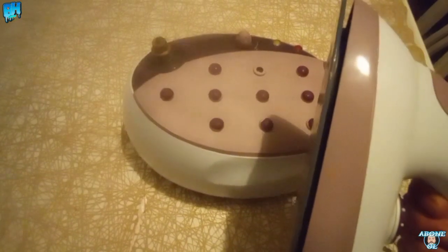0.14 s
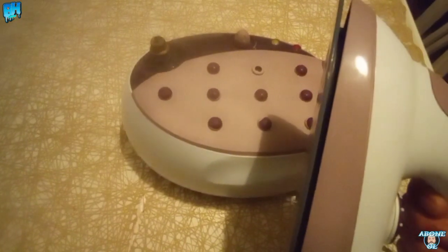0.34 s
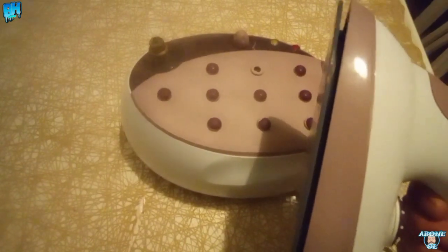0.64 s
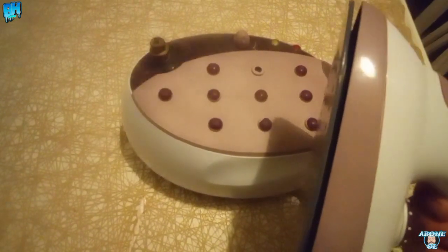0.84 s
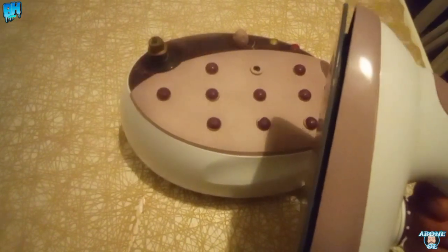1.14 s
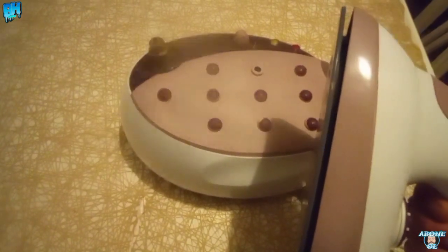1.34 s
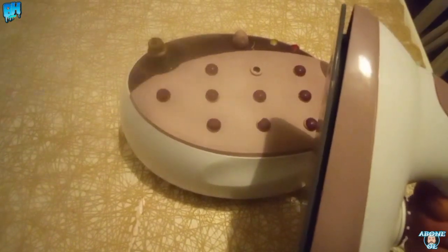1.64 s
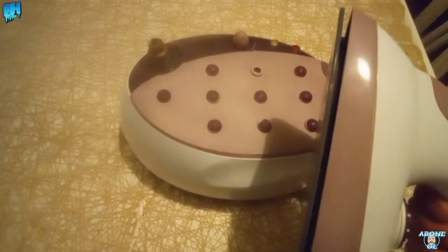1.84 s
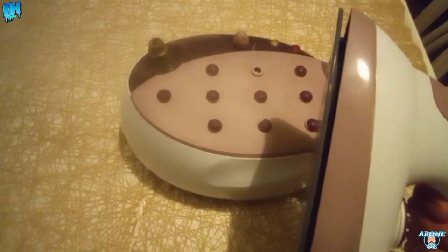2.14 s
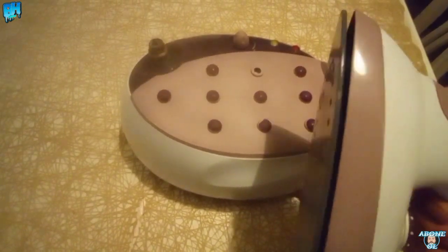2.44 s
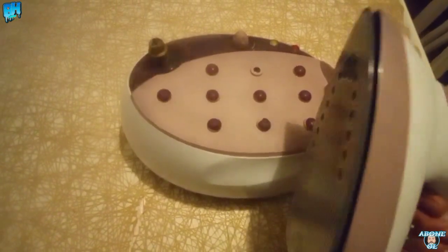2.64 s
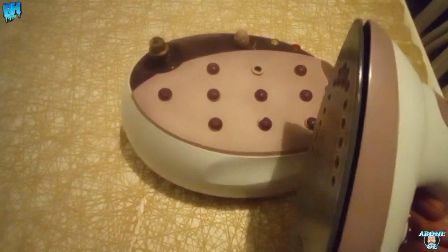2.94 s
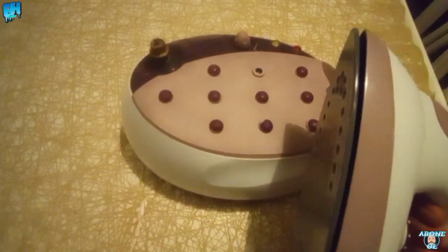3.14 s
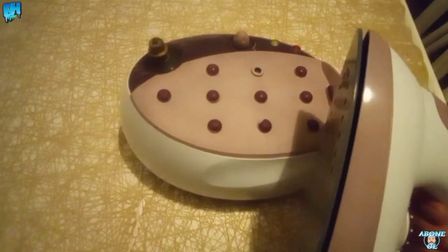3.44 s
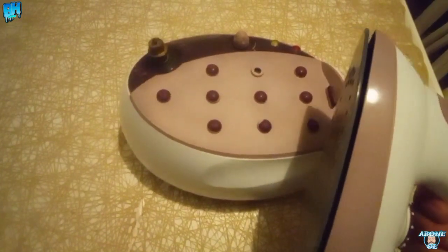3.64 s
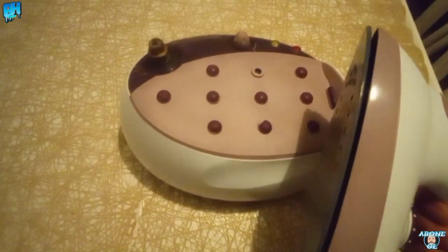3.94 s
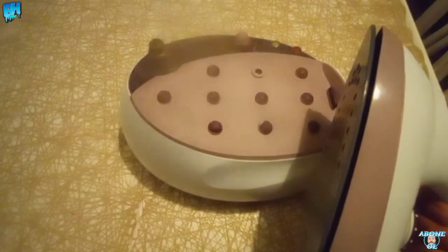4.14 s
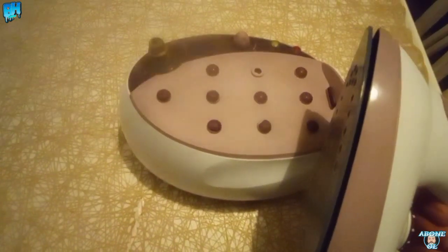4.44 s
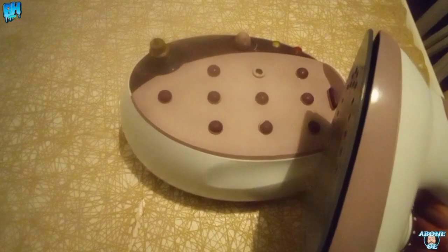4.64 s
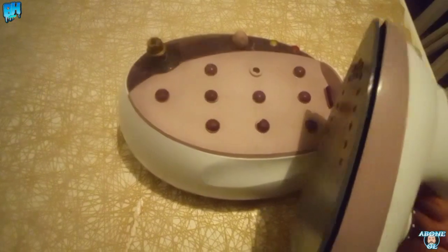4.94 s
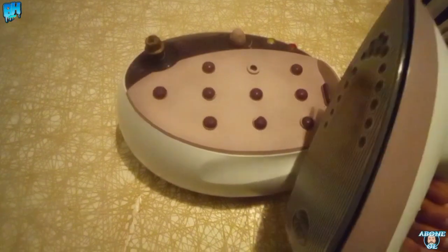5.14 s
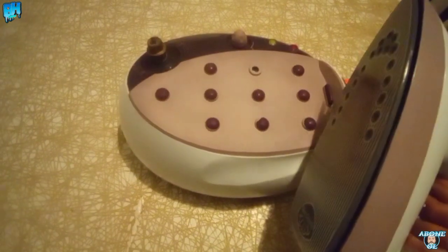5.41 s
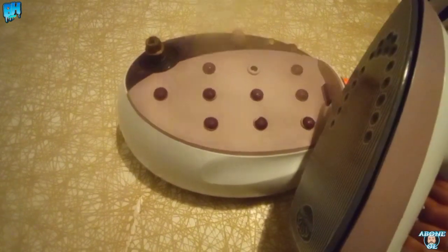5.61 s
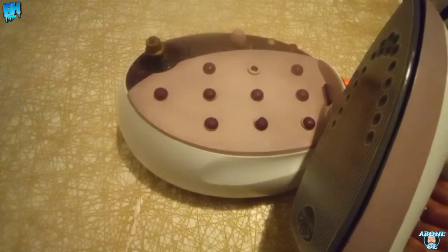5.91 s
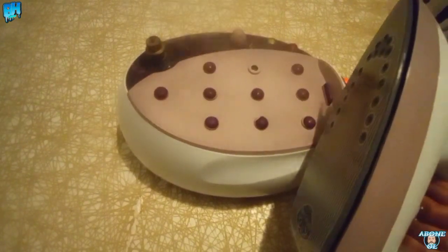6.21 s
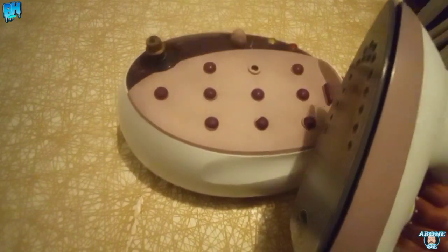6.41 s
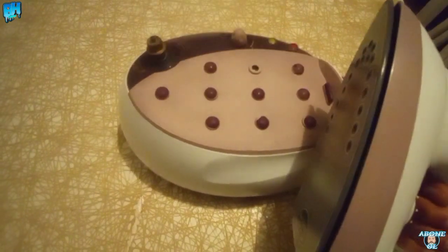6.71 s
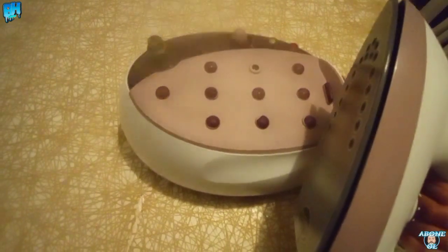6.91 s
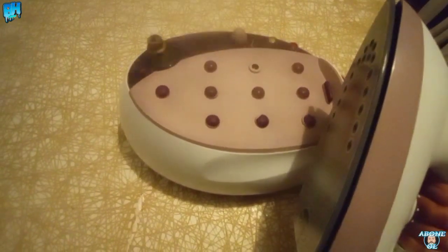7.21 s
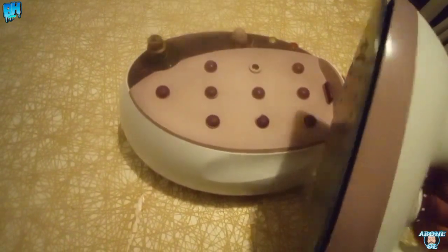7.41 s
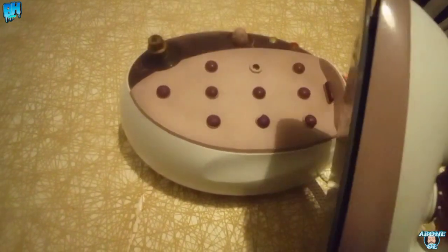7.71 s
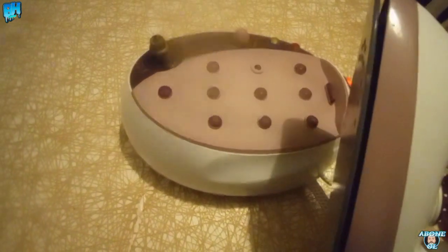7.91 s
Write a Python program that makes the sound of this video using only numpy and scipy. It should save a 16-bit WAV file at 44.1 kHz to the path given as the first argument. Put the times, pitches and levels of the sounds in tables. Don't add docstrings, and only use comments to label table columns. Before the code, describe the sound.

Close up in a small room, a steam iron fires airy, slightly whistling bursts of uneven length. Every burst opens with a sharp click and hard valve knock, and closes with a thinner click and weaker thud, leaving a short room tail. Quiet pauses reveal low simmering water, light handle taps and small plastic creaks. The final hiss continues to the cut, heard through one bass-light microphone.

```python
import sys
import numpy as np
from scipy import signal
from scipy.fft import rfft, irfft, next_fast_len
from scipy.io import wavfile
from scipy.ndimage import uniform_filter1d

SR = 44100
rng = np.random.default_rng(int(sys.argv[2]) if len(sys.argv) > 2 else 0)


def voltage_ratio(level):
    return 10 ** (np.asarray(level, float) / 20)


def master_out(mix):
    frames = np.transpose(np.atleast_2d(mix))
    ceiling = np.clip(frames, -1, 1)
    pcm = np.round(ceiling * 32767).astype(np.int16)
    wavfile.write(sys.argv[1], SR, pcm)


N = 355336

# snap_s, strike_s (steam starts), thump_s, strike_db, snap_hz
PRESSES = [
    (1.275, 1.288, 1.2928, -16, 5900),
    (4.0329, 4.041, 4.0448, -25, 6000),
    (5.5112, 5.5176, 5.5232, -17.5, 6680),
    (6.7492, 6.757, 6.7625, -18.5, 6680),
    (7.8049, 7.8183, 7.816, -18.5, 6020),
]
# snap_s, drop_s (plunger falls), thump_s, snap_db
RELEASES = [
    (.7038, .712, .716, -19.5),
    (2.563, 2.57, 2.578, -18),
    (4.8394, 4.85, 4.853, -18),
    (6.2736, 6.283, 6.287, -20.5),
    (7.4475, 7.455, 7.46, -17),
]


def evened(x):
    return x / np.sqrt(np.mean(x ** 2) + 1e-20)


def read(points, hz):
    f, value = np.transpose(points)
    return np.interp(np.log(hz + 1), np.log(f + 1), value)


def add(mix, start_s, sound):
    part = mix[round(start_s * SR):][:len(sound)]
    part += sound[:len(part)]


def noise(spectrum, size):
    hz = np.fft.rfftfreq(size, 1 / SR)
    white = rng.standard_normal(size)
    return evened(irfft(rfft(white) * voltage_ratio(read(spectrum, hz)), size))


def drift(seconds, size):
    span = max(round(seconds * SR), 2)
    wander = uniform_filter1d(rng.standard_normal(size), span)
    return evened(uniform_filter1d(wander, span))


def resonate(x, hz, width_hz):
    turn = np.exp(2j * np.pi * np.cumsum(hz * np.ones(len(x))) / SR)
    pole = np.exp(-2 * np.pi * width_hz / SR)
    smooth = signal.lfilter([1], np.poly([pole] * 3), x / turn)
    return evened((turn * smooth).real)


def ring(modes, t, longer=0.88, flip=1):
    out = np.zeros(len(t))
    for k, (hz, db, t60) in enumerate(modes):
        out += flip ** k * voltage_ratio(db - 60 * t / (t60 * longer)) * np.sin(2 * np.pi * hz * t)
    return out


def room(x):
    # pitch_hz, t60_s
    decay = [(150, 0.54), (400, 0.38), (1040, 0.44), (2760, 0.3), (6500, .28), (8500, 0.22), (12000, 0.24),
             (15000, 0.081)]
    echoes = np.zeros(SR)
    at = np.arange(200, SR - 20, 20)
    echoes[at + rng.integers(0, 20, len(at))] = rng.choice([-1., 1.], len(at))
    hz, t, z = signal.stft(echoes, SR, nperseg=256)
    fading = z * voltage_ratio(-60 * t / read(decay, hz)[:, None])
    tail = signal.istft(fading, SR, nperseg=256)[1]
    return signal.fftconvolve(x, tail / np.linalg.norm(tail))[:N]


def still_air():
    # pitch_hz, level_db per Hz
    floor = [(18, -25), (40, 1.5), (90, -0.5), (184, -6), (500, -16.5), (1000, -16.5), (1500, -18.5),
             (2350, -25), (6050, -32), (9000, -41.5), (16000, -44.5)]
    return voltage_ratio(-69) * noise(floor, N)


def boiler():
    # pitch_hz, width_hz, level_db
    shell_modes = [(364, 21, -14), (630, 29, -15), (1150, 68, .2), (1230, 140, -5.5), (1350, 70, -12),
                   (1740, 100, -9.5), (2220, 90, -21.5), (2660, 50, -21.5), (4900, 200, -28),
                   (6280, 140, -27)]
    bubbles = rng.standard_normal(N) * voltage_ratio(1.2 * drift(0.052, N))
    waver = 1 + 0.008 * drift(0.065, N)
    shell = np.zeros(N)
    for hz, width, db in shell_modes:
        shell += voltage_ratio(db + 1.9 * drift(0.055, N)) * resonate(bubbles, hz * waver, width)
    start_db, rise_db_per_s = -71.3, 0.85
    return voltage_ratio(start_db + rise_db_per_s * np.arange(N) / SR) * shell


def grip_rubs():
    # start_s, level_db, pitch_hz, length_s
    rubs = [(1.078, -63.5, 580, .074), (1.096, -72, 3300, .012), (2.735, -58.5, 420, 0.035),
            (2.737, -55, 1110, 0.033), (3.35, -60, 1750, .03), (3.348, -70, 700, .041),
            (3.505, -64, 600, .028), (3.704, -60, 470, .06), (4.962, -45.5, 524, .036),
            (5.09, -58, 130, .05), (5.19, -65, 480, .045), (7.704, -58, 2400, .014)]
    out, t = np.zeros(N), np.arange(6000) / SR
    for s, db, hz, length in rubs:
        swell = t / (0.27 * length) * np.exp(1 - t / (0.26 * length))
        add(out, s, voltage_ratio(db) * resonate(rng.standard_normal(len(t)), hz, 0.3 * hz) * swell)
    return out


def handle_taps():
    # pitch_hz, level_db per Hz
    scratch_colour = [(1500, -22), (3000, 6), (7000, -3.5), (10500, -19), (12000, -36.5), (15000, -31)]
    # start_s, level_db
    ticks = [(1.192, -56), (3.356, -54), (3.475, -62), (3.511, -44), (3.545, -57), (3.577, -53),
             (3.926, -53.5), (5.07, -55), (5.195, -58), (6.529, -48), (7.635, -49), (7.695, -46.5),
             (7.706, -49)]
    # start_s, level_db, shell_hz, hollow_db re shell, hollow_hz
    stops = [
        (.754, -28.5, 920, -16, 730),
        (.763, -28, 855, -10.5, 608),
        (5.024, -42.5, 984, 2, 483),
        (6.4, -56.5, 1230, -4, 350),
        (6.506, -49.5, 1150, -3.5, 630),
        (7.543, -39, 1000, -7, 590),
        (7.554, -48, 1300, 1.5, 585),
        (7.6395, -38, 1125, -0.5, 482),
    ]
    # start_s, level_db, shell_hz, scratch_db re shell
    slack = [
        (1.263, -46, 1120, -4.5),
        (4.03, -38, 1200, -22),
        (5.496, -37.5, 1080, -22),
        (6.728, -41, 1000, -13),
        (7.799, -49, 1620, -10.5),
    ]
    shell_hz, hollow_hz = 1150, 556
    taps = [(s, db, shell_hz, -15, hollow_hz, -27) for s, db in ticks]
    taps += [(*row, -11.5) for row in stops]
    taps += [(s, db, hz, -20.5, hollow_hz, scratch_db) for s, db, hz, scratch_db in slack]

    out, t = np.zeros(N), np.arange(6000) / SR
    fall = voltage_ratio(-60 * t / 0.044) * (1 - np.exp(-t / 0.00064))
    scrape = (1 - np.exp(-t / 0.00041)) * (np.exp(-t / 0.0022) + 0.096 * np.exp(-t / 0.012))
    for s, db, hz, low_db, low_hz, scratch_db in taps:
        white = rng.standard_normal(len(t))
        knock = np.sin(2 * np.pi * hz * t) + 0.63 * resonate(white, hz, 400)
        hollow = np.sin(2 * np.pi * low_hz * t) + 0.49 * resonate(white, low_hz, 160)
        scratch = noise(scratch_colour, len(t)) * scrape
        tap = knock * fall
        tap += voltage_ratio(low_db + 5.5) * hollow * fall ** 0.79
        tap += voltage_ratio(scratch_db + 4.5) * scratch
        add(out, s, voltage_ratio(db) * tap)
    return out


def trigger_switch():
    # pitch_hz, level_db per Hz
    crack_colour = [(290, -36), (500, -13), (1370, -4.5), (2560, -11), (4200, -4), (6050, 0), (8340, -6),
                    (9230, -16), (11700, -28), (14300, -15), (15400, -15), (16300, -18)]
    # start_s, peak_db
    chatter = [
        (.7542, -27),
        (.7607, -28),
        (1.2547, -50),
        (6.728, -33),
    ]
    snaps = [(s, -19, hz, 0.22) for s, _, _, _, hz in PRESSES]
    snaps += [(row[0], row[-1], 6700, 0.3) for row in RELEASES + chatter]

    out, t = np.zeros(N), np.arange(1024) / SR
    shape = (1 - np.exp(-t / 0.00033)) * (np.exp(-t / 0.0014) + 0.15 * np.exp(-t / 0.011))
    for s, db, hz, thin in snaps:
        crack = noise(crack_colour, len(t))
        crack = (1 - thin) * crack + thin * resonate(crack, hz, 900)
        add(out, s, voltage_ratio(db - 5) * crack * shape)
    return out


def housing_thumps():
    # pitch_hz, level_db, t60_s
    housing = [(128, -17, 0.16), (188, -24, 0.5), (210, -24, 0.067), (255, -31, 0.12), (358, -23, 0.2),
               (420, -25, .15), (472, -19.5, .25)]
    # start_s, peak_db, pitch_hz
    thumps = [(row[2], -13.6, 325) for row in PRESSES]
    thumps += [(row[2], -25.5, 370) for row in RELEASES]
    thumps += [(7.822, -21.5, 230)]

    lead_s = 0.004
    out, t = np.zeros(N), np.arange(12000) / SR
    for s, db, hz in thumps:
        turns = hz * (t - lead_s) * np.where(t > lead_s, 0.8, 1.1)
        bell = np.exp(-(turns / 0.5) ** 2)
        push = -np.cos(2 * np.pi * turns) * bell
        push -= bell * push.sum() / bell.sum()
        after = ring(housing, t, flip=-0.96) * (1 - np.exp(-(t / 0.006) ** 2))
        add(out, s - lead_s, voltage_ratio(db) * (push + after))
    return out


def shut_booms():
    out, t = np.zeros(N), np.arange(12000) / SR
    for _, drop_s, _, _ in RELEASES:
        boom = resonate(rng.standard_normal(len(t)), 401, 130) * t / 0.0046 * np.exp(1 - t / 0.005)
        add(out, drop_s - 0.002, voltage_ratio(-36) * boom)
    return out


def valve_plunger():
    # pitch_hz, level_db, t60_s
    body = [(1607, -1.5, 0.048), (1751, 3, 0.067), (1402, -7.5, 0.13), (1700, -8, 0.11),
            (2640, -16.5, 0.033)]
    # pitch_hz, width_hz, level_db
    rattles = [(6580, 160, -4), (8000, 1200, -9.5), (9600, 300, -7.5), (10000, 1000, -6),
               (12000, 1500, -14), (14400, 500, -4), (15300, 700, -.5)]
    # start_s, ring_db, sizzle_db, stretch of the ring, bounce_db re ring
    strikes = []
    for _, s, _, db, _ in PRESSES:
        harder_db = db + 18
        strikes.append((s, db, -32.5 + harder_db, 1.15 + 0.05 * harder_db, -7))
    strikes += [(row[1], -27, -56, 1.1, -6) for row in RELEASES]

    out, t = np.zeros(N), np.arange(12000) / SR
    for s, ring_db, sizzle_db, longer, bounce_db in strikes:
        white = rng.standard_normal(len(t))
        sizzle = voltage_ratio(-5.5) * white * np.exp(-t / 0.006)
        for hz, width, db in rattles:
            sizzle += voltage_ratio(db) * resonate(white, hz, width)
        sizzle *= (1 - np.exp(-t / 0.00097)) * (np.exp(-t / 0.0044) + 0.28 * np.exp(-t / 0.028))
        blow = ring(body, t, longer, flip=-0.99) * (1 - np.exp(-(t / 0.0016) ** 2))
        blow *= 0.17 + 0.81 * np.exp(-t / 0.0028)
        shaken = sum(resonate(white, hz, 45) for hz, _, _ in body[:2])
        shaken = shaken * t / 0.0239 * np.exp(1 - t / (0.017 * longer))
        add(out, s, voltage_ratio(ring_db) * (blow + 0.115 * shaken) + voltage_ratio(sizzle_db) * sizzle)
        add(out, s + 0.0051, voltage_ratio(ring_db + bounce_db) * blow)
    return out


def steam(open_s, shut_s, flow_db, vent_db):
    # pitch_hz, level_db per Hz
    rush_colour = [(24, -66.5), (40, -40.5), (174, -8.5), (370, -4), (422, -3.5), (622, 1), (1000, -1.5),
                   (2820, -0.5), (3150, -3.5), (4540, -7.5), (6560, -17.5), (7000, -24.5), (9100, -41),
                   (15400, -120)]
    # pitch_hz, level_db per Hz
    fizz_colour = [(4000, -14.5), (6000, -3), (6600, -5.5), (7100, -7.5), (8100, -14), (10000, -20.5),
                   (11000, -26), (12500, -31), (13900, -34.5), (14600, -21), (15700, -23), (16300, -30)]
    # pitch_hz, width_hz, level_db
    cavities = [(361, 40, -20), (630, 130, -15.5), (1710, 250, -10), (5280, 130, -18.5), (6500, 260, -18)]
    # pitch_hz, width_hz, level_db
    whistles = [(2590, 270, -13), (3057, 290, -13), (3164, 250, -11), (3536, 270, -11)]

    start = max(open_s, 0)
    size = next_fast_len(round((shut_s + 0.25 - start) * SR))
    t = start + np.arange(size) / SR
    age = t - open_s
    fresh = np.exp(-age / 0.45)
    left = np.exp(-np.maximum(t - shut_s, 0) / 0.024)
    speed = 1 - 0.33 * np.exp(-age / 0.024)

    white = rng.standard_normal((2, size))
    cavity, vents = np.zeros(size), np.zeros(size)
    for hz, width, db in cavities:
        cavity += voltage_ratio(db + 0.8 * drift(0.017, size)) * resonate(white[0], hz, width)
    for hz, width, db in whistles:
        vents += voltage_ratio(db + 1.5 * drift(0.05, size)) * resonate(white[1], hz * speed, width)
    vents *= voltage_ratio(vent_db + 3 * fresh) * (1 - np.exp(-age / 0.018))
    fizz = voltage_ratio(-9 + fresh + 0.72 * drift(0.002, size)) * noise(fizz_colour, size) * left ** 1.6

    rush = noise(rush_colour, size)
    dull = signal.sosfiltfilt(signal.butter(2, 1910, fs=SR, output="sos"), rush)
    rush = rush - (rush - dull) * np.exp(-age / 0.022)

    jet = voltage_ratio(1.5) * rush + cavity + vents + fizz
    flutter_db = 0.71 * drift(0.006, size) + 0.43 * drift(0.08, size)
    level = voltage_ratio(flow_db - 1.5 * fresh + flutter_db + 3.5)
    return start, level * (1 - np.exp(-age / 0.0027)) * left * jet


def scene():
    # settled flow_db, vent_db re flow
    bursts = [
        (-42, 3.5),
        (-41.5, 3.5),
        (-41.5, 0),
        (-41.5, 4),
        (-41.5, 4),
        (-42, 3.5),
    ]
    leak_s, shut_lag_s = 0.004, 0.003
    opens = [-1.] + [row[1] - leak_s for row in PRESSES]
    shuts = [row[1] + shut_lag_s for row in RELEASES] + [N / SR]
    jets = np.zeros(N)
    for open_s, shut_s, levels in zip(opens, shuts, bursts):
        add(jets, *steam(open_s, shut_s, *levels))
    knocks = valve_plunger() + shut_booms() + housing_thumps()
    clicks = trigger_switch() + handle_taps() + grip_rubs()
    wet = room(voltage_ratio(-10) * jets + voltage_ratio(-10.5) * knocks + voltage_ratio(-13.5) * clicks)
    return np.tile(jets + knocks + clicks + wet + boiler() + still_air(), (2, 1))


def top_cut(x):
    return signal.sosfilt(signal.butter(12, 16820, fs=SR, output="sos"), x)


def record(dry):
    bass_cut_hz, edge_hz = 110, 15760
    thin = signal.sosfilt(signal.butter(2, bass_cut_hz, "high", fs=SR, output="sos"), dry)
    band_limit = signal.firwin(511, edge_hz, window=("kaiser", 9), fs=SR)
    mix = signal.oaconvolve(thin, band_limit[None], "same")
    return top_cut(mix)


dry = scene()
out = record(dry)
master_out(out)
```